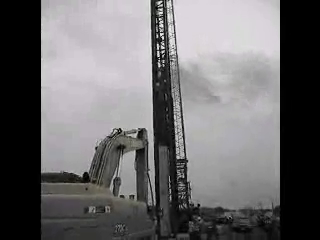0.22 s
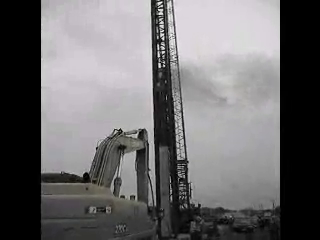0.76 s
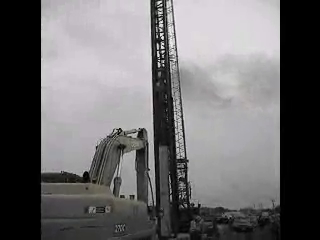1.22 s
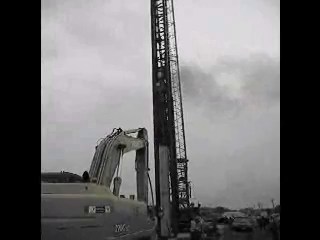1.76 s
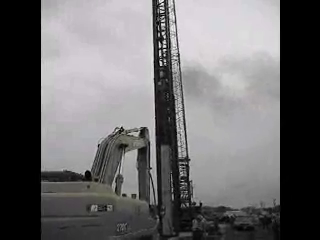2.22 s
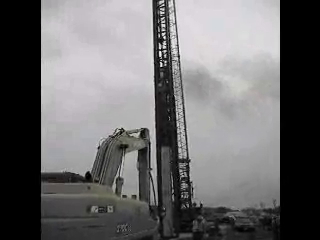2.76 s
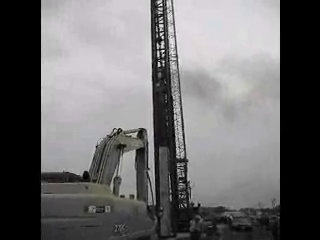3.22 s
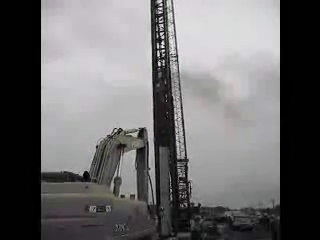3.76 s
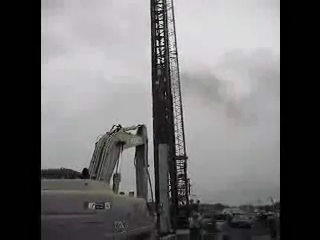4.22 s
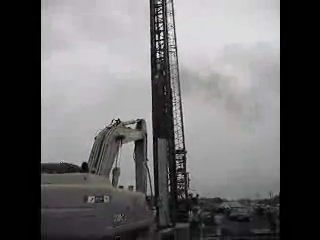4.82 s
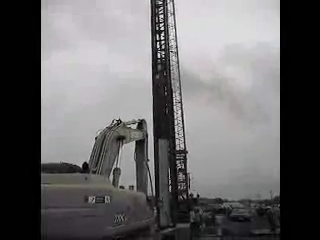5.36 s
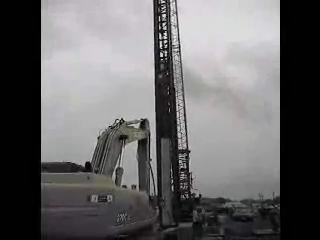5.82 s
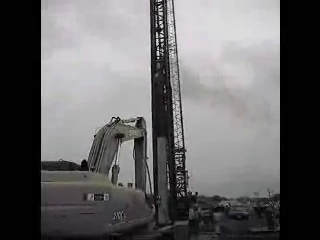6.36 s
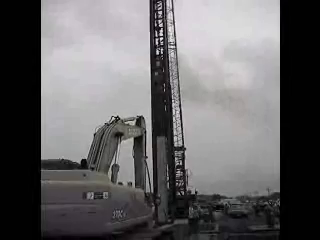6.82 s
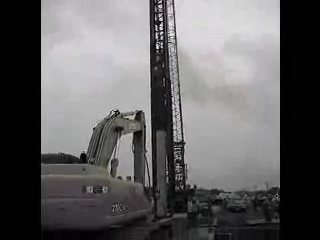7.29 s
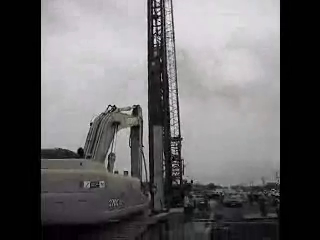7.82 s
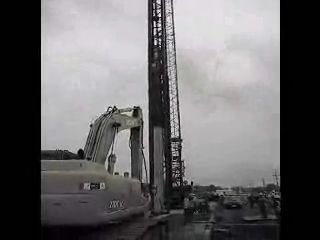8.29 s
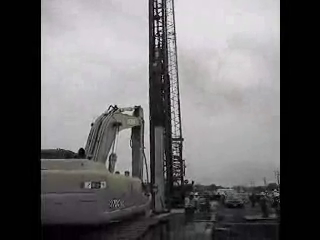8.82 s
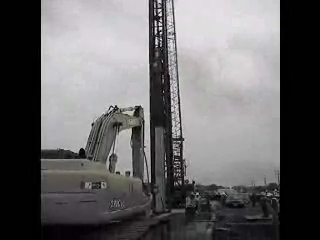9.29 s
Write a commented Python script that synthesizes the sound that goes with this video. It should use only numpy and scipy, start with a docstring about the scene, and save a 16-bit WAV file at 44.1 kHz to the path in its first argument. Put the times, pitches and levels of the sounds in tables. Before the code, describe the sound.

Eight evenly spaced pile blows, most very loud, the second and last ones weaker in ring. Each is a cluster of clashing steel tones, fading quickly, over a short low thud. Bright shaking and irregular rattles of the guide lattice follow, then thin out until the next rumble swells. Steady diesel idle lies beneath. Outdoors, dry, recorded on a small device with clipped peaks and a fluttering, papery treble hiss.

```python
"""A diesel hammer drives a steel pile about every 1.3 s: each blow is a set of fading pile tones and a low thud.
The steel lattice that guides the ram clatters (shaped noise and random pings) and rattles in short bursts.
Under it a rumble swells before each blow as the ram squeezes the air below it.
A diesel engine idles nearby: wavering tones, whines and a throbbing roar. The small microphone is dull on top
and overloads on loud peaks; a narrow treble noise band left by audio compression flutters with the loudness."""
import sys
import numpy as np
from scipy import signal
from scipy.io import wavfile
from scipy.ndimage import uniform_filter1d

SR = 44100
rng = np.random.default_rng(int(sys.argv[2]) if len(sys.argv) > 2 else 0)


def store_pcm(level_fs):
    """Save levels as 16-bit WAV."""
    pcm = np.round(np.clip(level_fs, -1, 1) * 32767).astype(np.int16)
    wavfile.write(sys.argv[1], SR, np.atleast_2d(pcm).T)


N = 421596

# All levels in the tables are relative: the functions below add their own trims.
# Blows of the ram: start_s, ring_db, thud_db, fall_db (clatter before the blow), hard_db (hard shake),
# hard_slope_db_per_s, loose_db (loose clatter), loose_slope_db_per_s, hum_db (pile wall),
# band_db (compression noise), rumble_db
BLOW_TABLE = [(0.188, -2.5, -14, -26.5, -11, -36, -21.5, -20.5, -13.5, -2.5, -36),
              (1.356, -16, -23, -33, -17.5, 14, -18.5, -28, -17.5, 1.5, -38.5),
              (2.572, -5.5, -14.5, -32, -13.5, -3, -15.5, -31, -16, 0.5, -43),
              (3.835, -4, -17, -31, -14, -14, -16, -37.5, -17, -2, -38.5),
              (5.114, -1.5, -14.5, -33, -10, -53, -15, -35, -15.5, 3, -33.5),
              (6.375, 0.5, -11, -30.5, -8, -77, -13.5, -40.5, -16.5, 0, -39.5),
              (7.651, 1, -14, -32, -8.5, -45, -19, -32.5, -16, -3.5, -39),
              (8.944, -16, -23, -35.5, -17.5, 1, -18, -26, -15, 1, -38)]
# Course of each stroke: fall_s (before the blow), hard_s (hard shake), climb_s (ram going up)
STROKE_TIMES = [(.19, .26, .5), (.33, .165, .51), (.33, .065, .48), (.24, .155, .495), (.41, .205, .525),
                (.325, .16, .485), (.29, .14, .52), (.36, .215, .44)]
# Tones of the pile: pitch_hz, level_db, fade_s (time to fall 60 dB)
PILE_TONES = [(543, -8, 0.34), (599, -9, 0.74), (613, -24.5, 0.41), (710, -19.5, 0.34), (790, 4, 0.2),
              (825, -3, 0.36), (868, -1, 0.53), (958, -2, 0.45), (1240, -9, 0.91), (1400, -25, 0.43),
              (1645, -2.5, 0.95), (1716, -7, 0.62), (2110, -24.5, 0.79), (2330, -5, 0.61), (2430, -5, .3),
              (2630, -9, 0.45), (2910, -28, 0.49), (3100, -3, 0.55), (3220, -20, .5), (3630, -3, 0.33),
              (3386, 11, 0.32), (3300, -17, .5), (3520, -9, .6), (4170, -8, .55), (4460, -30, .6)]
# Colour of the pile wall's hum: pitch_hz, level_db (per Hz)
WALL_COLOUR = [(88, -30.5), (150, -18), (409, -6.5), (691, -0.5), (798, -4.5), (906, -4), (982, -9.5),
               (1030, -10), (1300, -5), (1690, -16), (2860, -120)]
# Colour of the lattice's clatter: pitch_hz, level_db (per Hz)
LATTICE_COLOUR = [(600, -35.5), (1000, -4.5), (1700, -4), (2310, -0.5), (3430, 0), (3900, -3), (4800, -6.5),
                  (5300, -14), (5500, -15.5), (5950, -6.5), (6050, -24), (8000, -36.5)]
# Short rattles of the ram and cap against the lattice: start_s, peak_db, band_db (compression noise)
RATTLE_TABLE = [(0.01, -13, -51), (0.1032, -12, -47), (.33, -9, -43), (.6, -21, -44), (.655, -18.5, -38),
                (.4, -12, -29.5), (0.5182, -15, -40), (0.711, -15.5, -45), (1.026, -19, -52),
                (1.275, -14.5, -35), (1.41, -7, -45), (1.46, -4, -42), (1.572, -8.5, -34),
                (2.1829, -21.5, -55), (2.28, -18.5, -48), (2.43, -21, -40), (2.465, -13, -35),
                (2.695, -1, -40), (2.763, -6, -30), (2.83, -15, -34), (2.99, -20, -40), (3.597, -22, -45),
                (3.682, -15.5, -50), (3.778, -15.5, -50), (3.925, -1.5, -41), (3.975, -13, -31.5),
                (4.064, -12, -33), (4.133, -14.5, -36), (4.266, -13, -47), (4.3, -18.5, -53),
                (4.457, -17, -44), (4.625, -22, -45), (4.7117, -23, -47), (4.79, -38, -45),
                (4.944, -15.5, -42), (5.06, -16.5, -34.5), (5.208, 0, -46), (5.285, -8, -23),
                (5.35, -9, -32), (5.55, -18.5, -42), (5.6, -20, -45), (5.742, -17, -52),
                (6.175, -18.5, -48), (6.498, -8, -42), (6.56, -7.5, -45), (6.61, -10.5, -35),
                (6.67, -12, -36), (6.77, -28, -42), (6.916, -20, -42), (7.0514, -22.5, -44),
                (7.3674, -17.5, -42), (7.5694, -33, -43), (7.755, -2, -42), (7.813, -1.5, -42),
                (7.9089, -10.5, -52), (8.07, -21, -43.5), (8.39, -30, -46), (8.5834, -29, -41),
                (8.724, -23, -44), (8.8049, -17.5, -48), (8.864, -13.5, -36.5), (8.94, 0, -39),
                (9.03, -1.5, -42), (9.07, -4, -40), (9.21, -14.5, -39), (9.27, -14, -39), (9.4, -19, -42),
                (9.475, -17, -41.5), (9.514, -19, -44)]
# Colour of the rumble of ground and frame: pitch_hz, level_db (per Hz)
RUMBLE_COLOUR = [(15, -30), (30, -24), (60, -8.5), (110, -1), (180, -4.5), (300, -19)]
# Engine tones: multiple (of the firing rate), level_db
ENGINE_TONES = [(1, -45), (2, -45.5), (3, -59.5), (4, -52)]
# Pump and fan tones: pitch_hz, level_db, width_hz
WHINE_TONES = [(724.5, -51, 9.5), (1415, -47, 16), (920, -76, 15), (5360, -56, 81)]
# Colour of the engine's roar: pitch_hz, level_db (per Hz)
ROAR_COLOUR = [(12, -45), (30, -24), (60, -1.5), (93, -8.5), (120, -6), (214, -10), (253, -5.5),
               (321, -14.5), (700, -8), (1450, -13.5), (1650, -16.5), (3800, -24), (4200, -26),
               (5400, -32.5), (6100, -35.5), (7900, -88.5)]
# Colour of the noise band left by audio compression: pitch_hz, level_db (per Hz)
BAND_COLOUR = [(5900, -37), (6050, -14), (6400, 10), (7250, 10), (7350, -7.5), (8200, -14.5), (8900, -29)]
# Level of that noise band for each loudness of the clatter: shake_db, band_db
BAND_FOR_SHAKE = [(-42, -59), (-39.5, -53.5), (-31, -50.5), (-23.5, -42.5), (-17, -54), (1, -40)]

FALL_DB_PER_S, REST_DB = 7, -41.5  # growth of the clatter in the fall; shaking at rest
LEAD_S, LEAD_DB = 0.011, -10  # the cap is pressed just before the blow
LULL_S = 0.021  # the clatter of the fall stops as the ram meets the trapped air
EDGE_S = 0.015  # length of a soft end
HUM_DB_PER_S, HUM_SHARE_DB, HUM_REST_DB = -40, -5, -45.5  # fading, part tied to the shaking, rest level
PUSH_S, PUSH_DB_PER_S = 0.33, -66  # the rumble builds before the blow and dies after it
RATTLE_S, CREST_DB = 0.037, 13  # length of a rattle; its peak over its average (rms) level
FIRING_HZ = 63.1  # average firing rate of the engine
FLUTTER_DB = 6  # flutter of the compression noise at loud clatter, less at rest
MIC_HZ, EDGE_HZ = 8900, 15720  # upper limits of the microphone and of the converter


def hammer():
    """Adds every blow at its moment; each rings for up to one second."""
    out = np.zeros(N + SR)
    for start_s, ring_db, thud_db, *_ in BLOW_TABLE:
        out[round(start_s * SR):][:SR] += blow(ring_db, thud_db)
    return out[:N]


def blow(ring_db, thud_db):
    """The struck pile rings freely in many fading tones; the firing fuel adds a low thud."""
    t = np.arange(SR) / SR
    pitch_hz, level_db, fade_s = np.transpose(PILE_TONES)[:, :, None]
    chance = rng.random((len(PILE_TONES), 2))
    extra_db, phase = 4.6 * chance[:, :1], chance[:, 1:]
    fading = gain_of(level_db + extra_db - 60 * t / np.minimum(fade_s, 0.9))
    ring = (fading * np.sin(2 * np.pi * (pitch_hz * t + phase))).sum(0)
    thud = resonate(rng.standard_normal(SR), 218, 180)
    thud = evened(resonate(thud, 218, 180)) * gain_of(-60 * t / 0.21)
    return gain_of(ring_db - 23.5) * ring + gain_of(thud_db - 3.5) * thud


def steel():
    """Loose steel clatters loud and bright when shaken hard, quieter and duller as it settles."""
    shake_db, hum_db = stroke_curves()
    force_db = shake_db + 14.0
    clatter = gain_of(-3.5 + 0.15 * force_db) * noise(LATTICE_COLOUR, patchy_db=1.46)
    clatter += gain_of(-5.5) * pings(knocks_per_s=500, width_hz=3.46 / 0.14)
    dull = low_pass(clatter, 3960)
    clatter = dull + gain_of(0.38 * force_db) * (clatter - dull)  # harder shaking is brighter
    hum = gain_of(hum_db) * wall_hum()
    return gain_of(shake_db) * (clatter + hum) + rumble(force_db)


def stroke_curves():
    """Clatter as the ram falls, a hard shake at the blow, loose clatter while it climbs, then rest.

    Gives the shaking in dB, and the hum in dB relative to the shaking."""
    t = np.arange(N) / SR
    # powers are summed, so decibels are doubled before gain_of
    shake, hum = np.full(N, gain_of(2 * REST_DB)), np.full(N, gain_of(2 * HUM_REST_DB))
    for row, (fall_s, hard_s, climb_s) in zip(BLOW_TABLE, STROKE_TIMES):
        start_s, _, _, fall_db, hard_db, hard_slope, loose_db, loose_slope, hum_db, *_ = row
        near = slice(max(round((start_s - 0.6) * SR), 0), round((start_s + 1.2) * SR))
        u = t[near] - start_s  # seconds after the blow
        falling = span(-u, 0, fall_s) * span(u, -fall_s - EDGE_S, -LULL_S)
        shake[near] += gain_of(2 * (fall_db + FALL_DB_PER_S * u)) * falling
        shake[near] += gain_of(2 * (hard_db + LEAD_DB)) * span(-u, 0, LEAD_S)
        shake[near] += gain_of(2 * (hard_db + hard_slope * u)) * span(u, 0, hard_s)
        shake[near] += gain_of(2 * (loose_db + loose_slope * u)) * span(u, 0, climb_s)
        hum[near] += gain_of(2 * (hum_db + HUM_DB_PER_S * u)) * (u >= 0)
    shake += bursts(column=1, offset_db=-CREST_DB)
    return 10 * np.log10(shake), 10 * np.log10(hum / shake + gain_of(2 * HUM_SHARE_DB))


def bursts(column, offset_db):
    """Power of short bursts at the moments when the ram and cap rattle against the lattice."""
    power = np.zeros(N + SR)
    burst = signal.windows.tukey(round(RATTLE_S * SR), 0.4)
    for row in RATTLE_TABLE:
        power[round(row[0] * SR):][:len(burst)] += gain_of(2 * (row[column] + offset_db)) * burst
    return power[:N]


def pings(knocks_per_s, width_hz, count=72):
    """Many small steel parts, each with its own pitch, knocked at random moments."""
    pitches = np.linspace(1400, 5900, count) + 25 * rng.standard_normal(count)
    part = rng.integers(0, count, N)
    strength = gain_of(4.34 * rng.standard_normal(N))
    knocks = strength * (rng.random(N) < knocks_per_s / SR)
    total = np.zeros(N)
    for k, pitch_hz in enumerate(pitches):
        ringing = resonate(knocks * (part == k), pitch_hz, width_hz)
        total += gain_of(level_at(LATTICE_COLOUR, pitch_hz)) * resonate(ringing, pitch_hz, 91)
    return evened(total)


def wall_hum():
    """The pile wall hums: shaped noise, plus the lower pile tones, which share one random drive."""
    drive = rng.standard_normal(N)
    low_tones = sum(gain_of(level_db) * evened(resonate(drive, pitch_hz, 6.9))
                    for pitch_hz, level_db, _ in PILE_TONES if pitch_hz <= 1200)
    return gain_of(-3.5) * noise(WALL_COLOUR, patchy_db=1.5) + gain_of(-5.5) * evened(low_tones)


def rumble(force_db):
    """Ground and frame rumble with the smoothed shaking and with the squeezed air."""
    shaken = gain_of(-41 + 0.4 * uniform_filter1d(force_db, 1500))
    return (shaken + push()) * noise(RUMBLE_COLOUR, patchy_db=3.0)


def push():
    """Level of the rumble that swells as the ram squeezes the air below it, and dies after the blow."""
    t = np.arange(N) / SR
    level = np.zeros(N)
    for row in BLOW_TABLE:
        u = t - row[0]
        level += gain_of(row[-1] + PUSH_DB_PER_S * np.maximum(u, 0)) * np.clip(1 + u / PUSH_S, 0, 1)
    return level


def engine():
    """Tones at multiples of a wavering firing rate, whines, and a roar that throbs with each firing."""
    turns = np.cumsum(FIRING_HZ * (1 + 0.027 * drift(hz=6.2))) / SR  # firings so far
    tones = np.zeros(N)
    for multiple, level_db in ENGINE_TONES:
        tone = np.sqrt(2) * np.sin(2 * np.pi * (multiple * turns + rng.random()))
        tones += gain_of(level_db + 3.2 * drift(hz=20.14)) * tone
    throb = 1 + 0.071 * np.cos(2 * np.pi * turns)
    roar = noise(ROAR_COLOUR, patchy_db=4.5, patch_bins=2, patch_frames=14)
    roar_db = -35.5 + 1.0 * drift(hz=5.9)
    return tones + whines() + roar * throb * gain_of(roar_db)


def whines():
    """Pump and fan tones: noise narrowed by two resonances at the same pitch."""
    total = np.zeros(N)
    for pitch_hz, level_db, width_hz in WHINE_TONES:
        tone = resonate(rng.standard_normal(N), pitch_hz, width_hz)
        total += gain_of(level_db) * evened(resonate(tone, pitch_hz, 3 * width_hz))
    return total


def compression_noise():
    """Narrow noise band at 6 to 7.3 kHz left by audio compression, fluttering with loudness."""
    shake_db, t = stroke_curves()[0], np.arange(N) / SR
    starts_s, stroke_band_db = np.transpose(BLOW_TABLE)[[0, -2]]
    stroke = np.maximum(np.searchsorted(starts_s, t) - 1, 0)  # latest blow; the first one before that
    swing_db = FLUTTER_DB * drift(hz=34.87) + stroke_band_db[stroke]
    swing_db *= np.clip((shake_db - REST_DB) / 13.0, 0, 1)  # no swing at rest
    follow_db = np.interp(shake_db, *np.transpose(BAND_FOR_SHAKE))
    power = gain_of(2 * (follow_db + swing_db)) + bursts(column=2, offset_db=-3)
    return np.sqrt(power) * noise(BAND_COLOUR, patchy_db=0.8)


def gain_of(db):
    """Decibels to gain."""
    return 10 ** (np.asarray(db) / 20)


def evened(x):
    """Scales to an average (rms) level of 1."""
    return x / np.sqrt(np.mean(x ** 2) + 1e-20)


def span(t, start, end):
    """One between start and end, with a soft end."""
    return (t >= start) * np.clip((end - t) / EDGE_S + 0.5, 0, 1)


def drift(hz):
    """Slow chance: random points, hz of them a second, joined by straight lines."""
    points = rng.standard_normal(1000)
    return np.interp(np.arange(N) / SR * hz, np.arange(1000), points)


def level_at(colour, hz):
    """Level in dB of a colour table at hz, read along a log pitch axis."""
    pitch_hz, level_db = np.transpose(colour)
    return np.interp(np.log(hz + 1), np.log(pitch_hz + 1), level_db, left=-100, right=-100)


def noise(colour, patchy_db, patch_bins=4, patch_frames=8):
    """Coloured noise built from random short spectra whose patches swell and fade."""
    hz = np.fft.rfftfreq(1024, 1 / SR)
    real, imaginary, patches = rng.standard_normal((N // 256 + 5, 513, 3)).T
    patches = uniform_filter1d(patches, patch_bins, 0)  # smooth over pitch
    patches = evened(uniform_filter1d(patches, patch_frames, 1))  # then over time
    level_db = level_at(colour, hz)[:, None] + patchy_db * patches
    spectra = (real + 1j * imaginary) * gain_of(level_db)
    return evened(signal.istft(spectra, nperseg=1024, noverlap=768)[1][:N])


def resonate(x, hz, width):
    """One resonance at hz with a gain of about 1 there; a narrower width in Hz rings longer."""
    r = np.exp(-np.pi * width / SR)
    c = np.cos(2 * np.pi * hz / SR)
    return signal.lfilter([2 * (1 - r), -2 * (1 - r) * r * c], [1, -2 * r * c, r * r], x)


def low_pass(x, hz):
    """Steeply removes what lies above hz."""
    return signal.oaconvolve(x, signal.firwin(1023, hz, window=("kaiser", 9), fs=SR), "same")


def scene():
    """Hammer, steel, engine and compression noise, in mono."""
    return (hammer() + steel() + engine() + compression_noise())[None]


def record(dry):
    """The capsule squeezes loud peaks and dulls the top treble; the converter then clips."""
    knee, ceiling = 1.23, 0.72
    squeezed = low_pass(knee * np.tanh(dry[0] / knee), MIC_HZ)
    dull = low_pass(squeezed, 7950)
    heard = dull + gain_of(-5.0) * (squeezed - dull)
    return low_pass(np.clip(heard, -ceiling, ceiling), EDGE_HZ)[None]


dry = scene()
out = record(dry)
store_pcm(out)
```